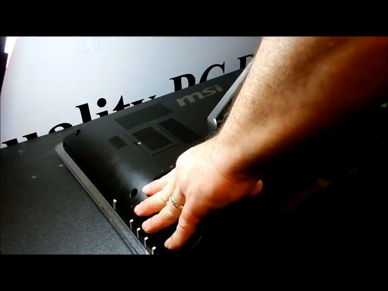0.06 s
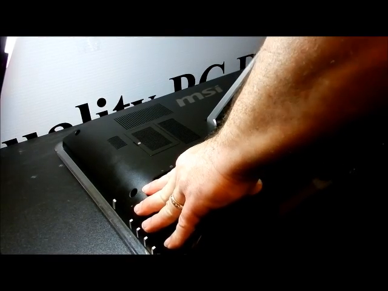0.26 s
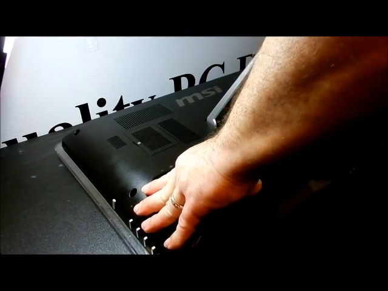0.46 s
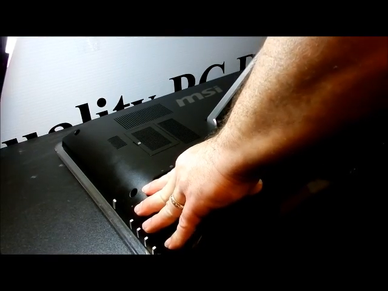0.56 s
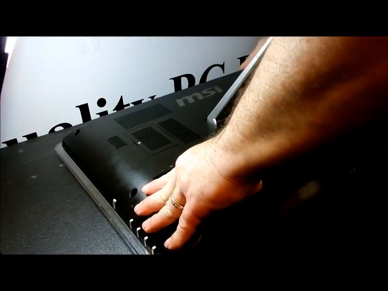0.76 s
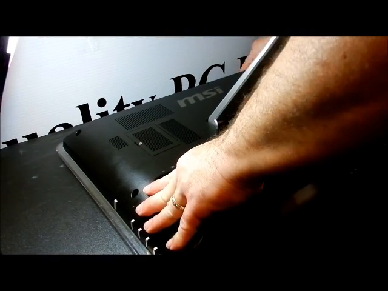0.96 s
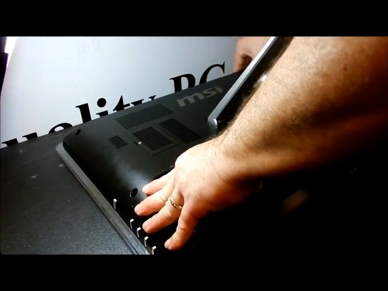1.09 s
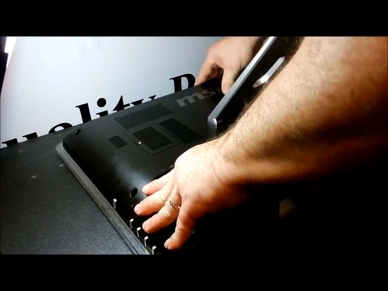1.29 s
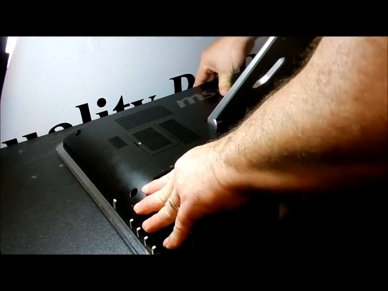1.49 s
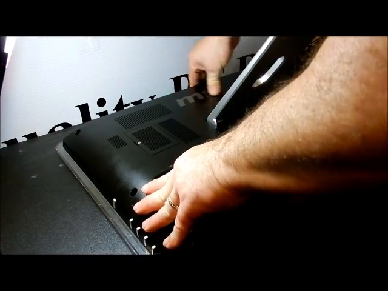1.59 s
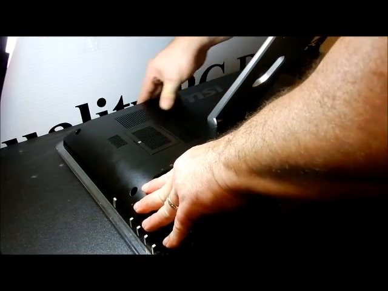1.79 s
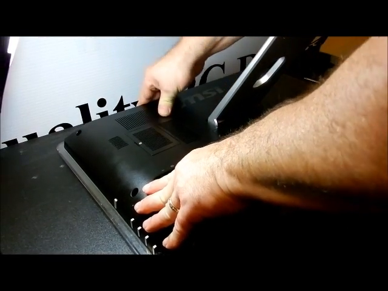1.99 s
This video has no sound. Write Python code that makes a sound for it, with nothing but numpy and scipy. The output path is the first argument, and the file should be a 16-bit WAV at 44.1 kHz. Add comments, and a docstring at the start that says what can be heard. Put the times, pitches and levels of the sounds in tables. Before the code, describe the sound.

A plastic computer cover snaps shut with two sharp clicks, creaking as a hand presses it. The case thumps softly on a workbench, then hands slide over it with light knocks and tiny ticks in a small room.

```python
"""Snapping a computer cover shut

A plastic cover is pressed down by hand on a workbench in a small room. Skin slides over it,
and it creaks and knocks under the palm. Two clips snap home: each cracks, and the freed cover
lands a moment later. The case thumps on the bench; then the hands shift, with more knocks,
a hollow judder and a few tiny ticks."""
import sys
import numpy as np
from scipy import signal
from scipy.fft import rfft, irfft, next_fast_len
from scipy.io import wavfile
from scipy.ndimage import uniform_filter1d

SR = 44100
rng = np.random.default_rng(int(sys.argv[2]) if len(sys.argv) > 2 else 0)


def log_audio(samples):
    """Write samples as a 16-bit WAV file to the path given in sys.argv[1]."""
    # one column per channel
    frames = np.atleast_2d(samples).T
    # limit to full scale, then quantise
    limited = np.clip(frames, -1, 1)
    pcm = np.round(limited * 32767).astype(np.int16)
    wavfile.write(sys.argv[1], SR, pcm)


N = 90404
RING_TIME = np.arange(24000) / SR  # seconds since a blow
KNOCK_RISE_S = 0.0025

# The two clips. Each row: start in seconds, crack level in dB, treble tilt in dB per octave, hook pitch
# in Hz, hook level in dB, landing delay in seconds, landing level in dB, landing pitch ratio.
SNAPS = [(0.2338, -18, -1, 2487, -16, .0135, -19, 0.98), (0.4126, -15, 1, 1633, -18.5, .0115, -19.5, 1.02)]
# Dull contact noise. Each row: band centre in Hz, level in dB, time to fall 60 dB (t60) in seconds.
THUD = [(98.5, -20.5, 0.3), (238, -24, 0.16), (470, -2, 0.062), (900, -5.5, 0.098), (1990, -5.5, 0.042),
        (3200, -13, 0.11), (9000, -37, .03)]


def amp(db):
    """Decibels to gain."""
    return 10 ** (np.asarray(db) / 20)


def unit(x):
    """Scale to rms 1."""
    return x / np.sqrt(np.mean(x ** 2) + 1e-20)


def along(points, hz):
    """Read a curve of (Hz, value) points on a log frequency axis."""
    freqs, values = np.transpose(points)
    return np.interp(np.log(hz + 1), np.log(freqs + 1), values)


def fader(rows):
    """A gain for each sample from (seconds, dB) points."""
    return amp(np.interp(np.arange(N) / SR, *np.transpose(rows)))


def attack(rise_s):
    """An onset that eases up to full level."""
    return 1 - np.exp(-RING_TIME / rise_s)


def filtered(x, response):
    """Shape x with a gain for each frequency."""
    n = x.shape[-1]
    size = next_fast_len(n + SR // 4)
    return irfft(rfft(x, size) * response(np.fft.rfftfreq(size, 1 / SR)), size)[..., :n]


def soften(blow, cutoff_hz):
    """A soft contact takes the treble away."""
    return signal.sosfilt(signal.butter(2, cutoff_hz, fs=SR, output="sos"), blow)


def add(track, start_s, sound):
    """Mix a sound into a track."""
    part = track[..., round(start_s * SR):][..., :sound.shape[-1]]
    part += sound[..., :part.shape[-1]]


def noise(n, response):
    """Coloured stereo noise of rms 1, narrowest in the mids."""
    # Stereo width. Each row: frequency in Hz, side over mid in dB.
    width = [(30, -2), (300, -16), (1200, -13), (3000, -7), (12000, -3.5)]
    size = next_fast_len(n)
    hz = np.fft.rfftfreq(size, 1 / SR)
    spectrum = rfft(rng.standard_normal((2, size))) * response(hz)
    mid, side = spectrum[0], spectrum[1] * amp(along(width, hz))
    return unit(irfft(np.array([mid + side, mid - side]), size)[:, :n])


def band(bands, k, hz):
    """Gain of band k among overlapping bands; the lowest rolls off below its centre."""
    share = along([(row[0], float(i == k)) for i, row in enumerate(bands)], hz)
    return np.sqrt(share) * np.minimum(hz / bands[0][0], 1) ** 2


def burst(bands, tilt_db=0):
    """Noise that starts at once and dies band by band, tilted per octave above 1 kHz."""
    out, n = np.zeros((2, len(RING_TIME))), len(RING_TIME) // 4
    for k, (centre_hz, db, t60) in enumerate(bands):
        start_db = db + tilt_db * np.log2(max(centre_hz / 1000, 1))
        decay = amp(start_db - 60 * RING_TIME[:n] / t60)
        out[:, :n] += noise(n, lambda hz: band(bands, k, hz)) * decay
    return out


def ring(modes, pitch=1, scatter_db=3.5, detune=0.012):
    """Decaying modes, weighted and tuned anew by each blow; neighbours swing in opposite directions."""
    out = np.zeros(len(RING_TIME))
    for k, (hz, db, t60) in enumerate(modes):
        decay = amp(db + scatter_db * rng.standard_normal() - 60 * RING_TIME / t60)
        tuned_hz = hz * pitch * (1 + detune * rng.standard_normal())
        out += (-1) ** k * decay * np.sin(2 * np.pi * tuned_hz * RING_TIME)
    return out


def colour(snap):
    """The smoothed spectrum of a snap, as a gain for each frequency."""
    power = uniform_filter1d(np.abs(rfft(snap.mean(axis=0))) ** 2, size=120)
    return lambda hz: np.interp(hz, np.fft.rfftfreq(len(RING_TIME), 1 / SR), np.sqrt(np.abs(power)))


def room_tone(db=-70):
    """The faint, dark background of the room."""
    # Each point: frequency in Hz, relative level in dB.
    spectrum = [(20, -29), (110, -16.5), (450, -9), (1000, -12), (3000, -33.5), (15000, -36.5)]
    return amp(db) * noise(N, lambda hz: amp(along(spectrum, hz)))


def sliding():
    """Skin hisses over the matt plastic."""
    # The strokes of the hand. Each row: time in seconds, level in dB.
    strokes = [(0, -75), (.17, -58), (.36, -59), (.62, -84), (.69, -66.5), (.77, -84), (.83, -75),
               (.88, -82), (.97, -77), (1.02, -59), (1.07, -66.5), (1.13, -58.5), (1.19, -60), (1.215, -46),
               (1.29, -52), (1.37, -51), (1.42, -52.5), (1.48, -51), (1.64, -63.5), (1.72, -50.5),
               (1.755, -39.5), (1.81, -57), (1.845, -45), (1.92, -44.5), (1.98, -59.5), (2.05, -58)]
    # The colour of the hiss. Each row: frequency in Hz, relative level in dB.
    skin = [(100, -14.5), (600, 4), (1300, 5.5), (2800, -3.5), (11500, 0.5), (15500, -5.5)]
    return fader(strokes) * noise(N, lambda hz: amp(along(skin, hz)))


def pressing(slips_per_s=280, creak_db=-8.5, rumble_db=-2):
    """Under the palm, many tiny slips ring the cover into a creak, and the bench rumbles."""
    # The swell of creak and rumble together. Each row: time in seconds, level in dB.
    pressure = [(0, -48), (.18, -51), (.33, -38.5), (.48, -39), (.62, -57.5), (.77, -82.5), (.87, -54.5),
                (.96, -61.5), (1.1, -52.5), (1.25, -47), (1.38, -50), (1.58, -49), (1.68, -43.5),
                (1.91, -43), (2.05, -44)]
    # The colour of the rumble. Each row: frequency in Hz, relative level in dB.
    spectrum = [(45, -26.5), (90, -12.5), (160, -6.5), (230, -17.5), (340, -9), (800, -18), (2500, -35.5),
                (15000, -40.5)]
    slips = (rng.random(N) < slips_per_s / SR) * rng.standard_normal(N)
    one_slip = knock(cutoff_hz=980, pitch=0.92, bench_db=-23.5)
    creak = unit(signal.fftconvolve(slips[None], one_slip, axes=1)[:, :N])
    rumble = noise(N, lambda hz: amp(along(spectrum, hz)))
    return fader(pressure) * (amp(creak_db) * creak + amp(rumble_db) * rumble)


def knock(cutoff_hz, pitch, bench_db):
    """One blow rings the cover, and the bench booms after it."""
    # Modes of the cover and of the bench. Each row: frequency in Hz, level in dB, t60 in seconds.
    cover = [(337.5, -14, .27), (398.6, -13, 0.3), (436.2, 0, 0.13), (470, -10.5, 0.13), (532, -8, 0.12),
             (635, -12.5, 0.06), (676.7, -12.5, 0.13), (840, -20.5, 0.074), (1001, -13, .08)]
    bench = [(97.6, -2.5, 0.2), (132.6, -8, 0.49), (159.4, 1, 0.27)]
    blow = (ring(cover, pitch) + burst(THUD)) * attack(KNOCK_RISE_S)
    boom = amp(bench_db) * ring(bench) * attack(rise_s=0.0046)
    return boom + soften(blow, cutoff_hz)


def cover_knocks():
    """The cover knocks as the hands move."""
    # Each row: start in seconds, level in dB, contact cut-off in Hz, pitch ratio, bench boom in dB.
    blows = [(0.028, -36, 640, 0.9, -4), (.084, -37, 1040, 0.91, -4.5), (0.355, -37, 900, 0.85, -32),
             (1.028, -41.5, 4300, 1.01, -19), (1.164, -42, 1280, 0.95, -9), (1.440, -33, 4430, 1.55, -21),
             (1.454, -42.5, 9000, 1.48, -34), (1.516, -27, 550, 0.95, -20), (1.622, -32, 1380, 0.93, -26),
             (1.649, -35.5, 780, 1.18, -6), (1.740, -27.5, 3000, 1.2, -37), (1.754, -20.5, 900, 1, -40),
             (1.859, -30.5, 620, 0.96, -21), (1.952, -35, 1060, 0.94, -8), (1.984, -29, 1400, 1.15, -24),
             (2.028, -36, 686, 1.2, -20)]
    out = np.zeros((2, N))
    for start, db, cutoff_hz, pitch, bench_db in blows:
        add(out, start, amp(db) * knock(cutoff_hz, pitch, bench_db))
    return out


def clip_snaps(fizz_s=0.024, fizz_db=-11, room_db=0.5):
    """A fizz swells into each snap; the hook cracks and rings as it lets go, and the room answers."""
    # Noise of the crack. Each row: band centre in Hz, level in dB, t60 in seconds.
    crack_bands = [(248, -19.5, 0.072), (455, -3.5, 0.04), (900, -5.5, 0.054), (1540, -3.5, 0.033),
                   (3120, -5.5, 0.023), (5100, -2.5, 0.033), (8800, -2, 0.024), (13800, -4, 0.037)]
    # Modes of the freed hook. Each row: ratio to its pitch, level in dB, t60 in seconds.
    hook_modes = [(1, -0.5, 0.038), (0.7, -6, 0.035), (.64, -9.5, 0.055)]
    out, n = np.zeros((2, N)), round(fizz_s * SR)
    for start, db, tilt_db, hook_hz, hook_db, *_ in SNAPS:
        crack = amp(db) * burst(crack_bands, tilt_db)
        hook = amp(hook_db) * ring(hook_modes, hook_hz)
        snap = (crack + hook) * attack(rise_s=0.00037)
        fizz = amp(db + fizz_db) * noise(n, colour(snap)) * np.linspace(0, 1, n)
        reverb = amp(room_db) * filtered(room_tail(), colour(snap))
        add(out, start - fizz_s, fizz)
        add(out, start, snap + reverb)
    return out


def landings():
    """The freed cover lands just after each snap."""
    out = np.zeros((2, N))
    for start, *_, delay, db, pitch in SNAPS:
        add(out, start + delay, amp(db) * knock(cutoff_hz=1600, pitch=pitch, bench_db=-25))
    return out


def case_thump(start_s=0.812, db=-34.5, contact_db=-0.5):
    """The whole case rocks down on the bench with a broad, dull thud."""
    # Modes of the case. Each row: frequency in Hz, level in dB, t60 in seconds.
    case_modes = [(167.2, -8, 0.29), (301, -9.5, 0.095), (410, -2, 0.22), (510, -3.5, 0.095),
                  (685, -4.5, 0.09), (793, 0, 0.054)]
    out = np.zeros((2, N))
    blow = (ring(case_modes) + amp(contact_db) * burst(THUD)) * attack(KNOCK_RISE_S)
    add(out, start_s, amp(db) * soften(blow, cutoff_hz=2030))
    return out


def judder(grit_db=-3):
    """A quick run of gritty slips rings something hollow."""
    # The slips. Each row: start in seconds, level in dB.
    slips = [(1.205, -44), (1.216, -36.5), (1.224, -35), (1.237, -36.5), (1.250, -40)]
    # The hollow modes. Each row: frequency in Hz, level in dB, t60 in seconds.
    hollow = [(187, -5, 0.13), (565, 5.5, 0.17), (678, 0, 0.089), (836, 8.5, 0.077), (940, 5.5, 0.067),
              (1060, 5, 0.045), (1193, 3, 0.05), (1480, -9, 0.13)]
    out = np.zeros((2, N))
    for start, db in slips:
        slip = ring(hollow) + amp(grit_db) * burst(THUD)
        add(out, start, amp(db) * slip * attack(KNOCK_RISE_S))
    return out


def ticks():
    """Tiny bright ticks as the hands move."""
    # Each row: start in seconds, level in dB.
    cues = [(1.489, -41), (1.741, -36.5), (2.047, -48.5)]
    # Noise of a tick. Each row: band centre in Hz, level in dB, t60 in seconds.
    bands = [(6740, 2.5, 0.015), (11800, 4.5, 0.016)]
    out = np.zeros((2, N))
    for start, db in cues:
        add(out, start, amp(db) * burst(bands))
    return out


def room_tail():
    """The short answer of the room, building up as the walls reflect."""
    # The reverb. Each row: band centre in Hz, level in dB, t60 in seconds.
    bands = [(123, -10, 0.48), (270, -8, 0.26), (470, -9, 0.35), (1400, -5.5, 0.32), (3000, -4, 0.23),
             (7250, 0, 0.24), (13900, -7, 0.13)]
    n = len(RING_TIME)
    out, grid_hz = np.zeros((2, n)), np.linspace(0, SR / 2, n)
    for k, (_, db, t60) in enumerate(bands):
        envelope = attack(rise_s=0.0043) * amp(-60 * RING_TIME / t60)
        reflections = unit(noise(n, lambda hz: band(bands, k, hz)) * envelope)
        share = np.mean(band(bands, k, grid_hz) ** 2)
        out += amp(db) * np.sqrt(share / n) * reflections
    return out


def room(hits, renew_s=0.35):
    """Each stretch of sound gets a fresh tail, so that alike hits are not all coloured the same way."""
    out, step = np.zeros((2, N)), round(renew_s * SR)
    mono = hits.mean(axis=0, keepdims=True)
    for i in range(0, N, step):
        add(out, i / SR, signal.fftconvolve(mono[:, i:i + step], room_tail(), axes=1))
    return out


def scene():
    """Snaps and handling in the room, over rubbing and a faint background."""
    hits = landings() + case_thump() + cover_knocks() + judder() + ticks()
    return clip_snaps() + hits + room(hits) + pressing() + sliding() + room_tone()


def record(dry, low_hz=52.3, ceiling=0.75, top_hz=15950, edge_hz=200):
    """The microphone thins the deep bass, rounds off the highest peaks and cuts the very top."""
    thin = signal.sosfilt(signal.butter(3, low_hz, btype="high", fs=SR, output="sos"), dry)
    rounded = ceiling * np.tanh(thin / ceiling)
    return filtered(rounded, lambda hz: np.clip((top_hz - hz) / edge_hz, 0, 1))


dry = scene()
out = record(dry)
log_audio(out)
```